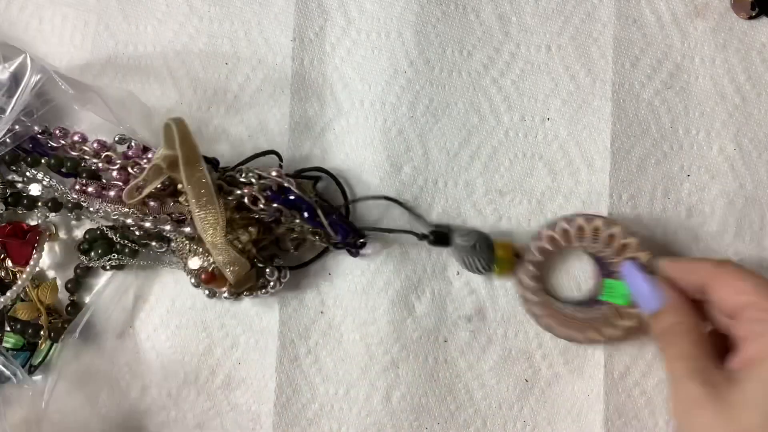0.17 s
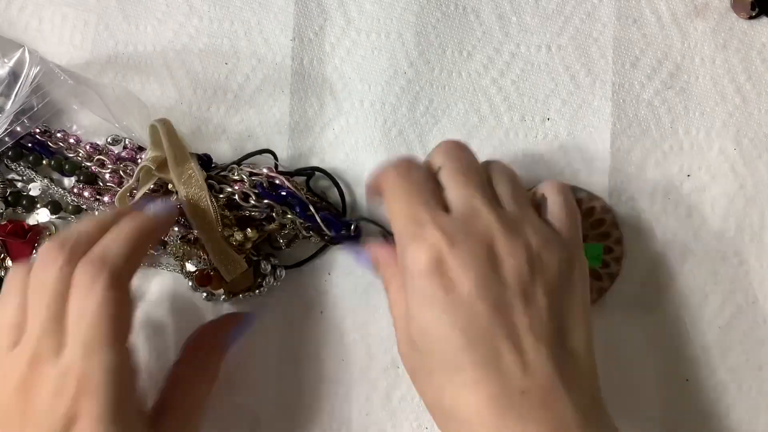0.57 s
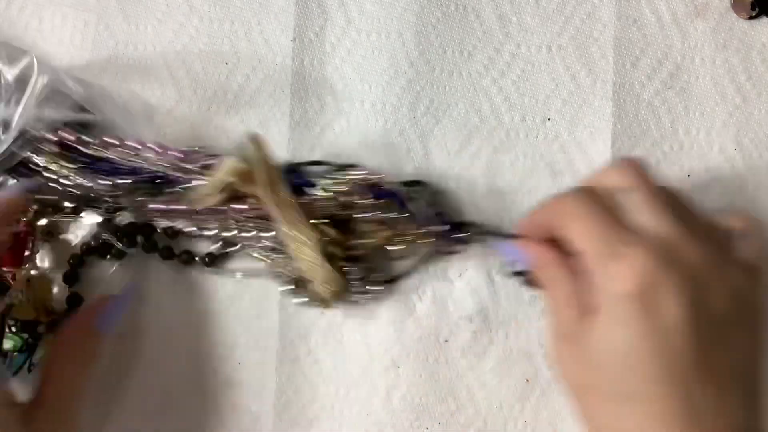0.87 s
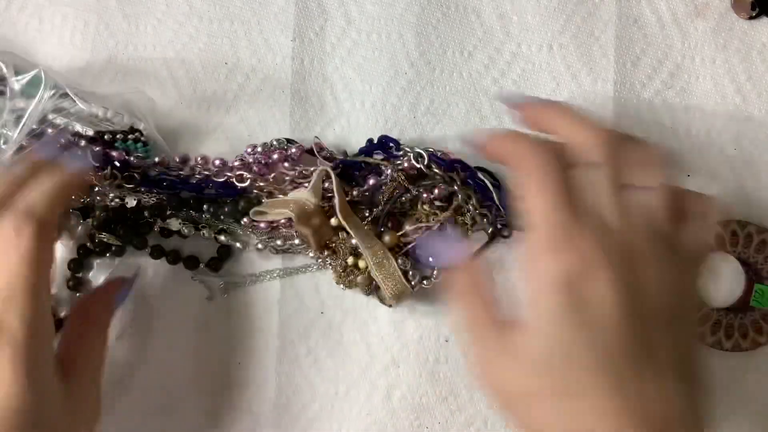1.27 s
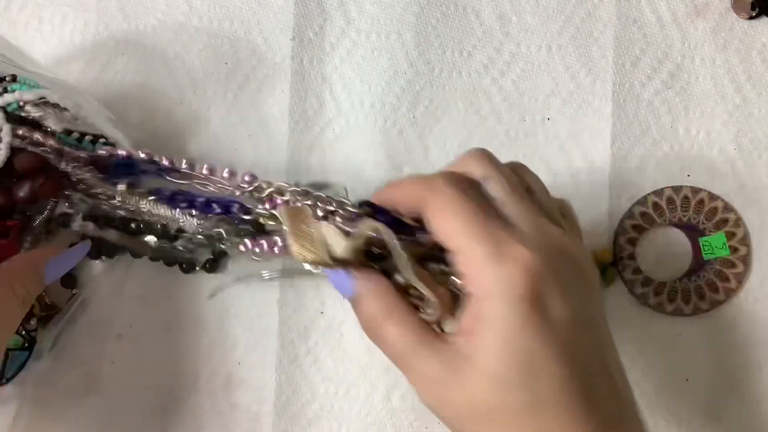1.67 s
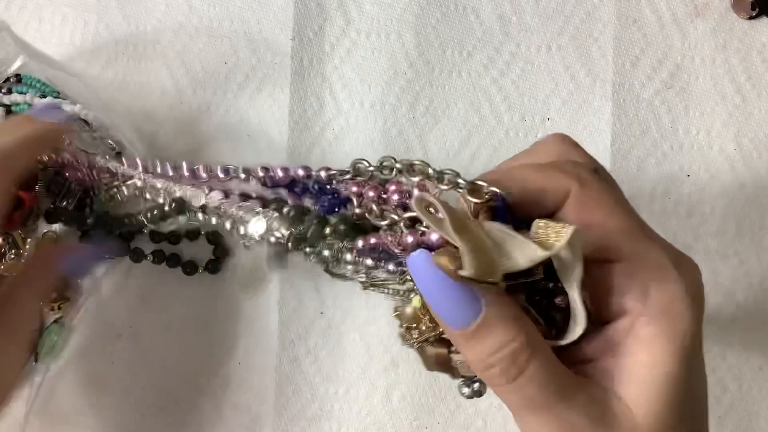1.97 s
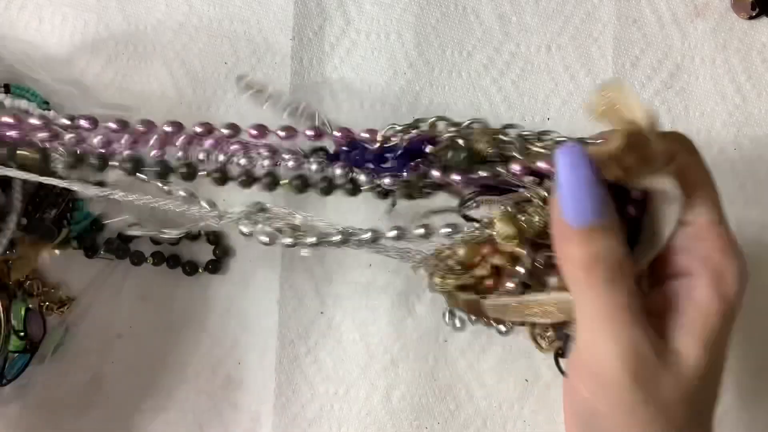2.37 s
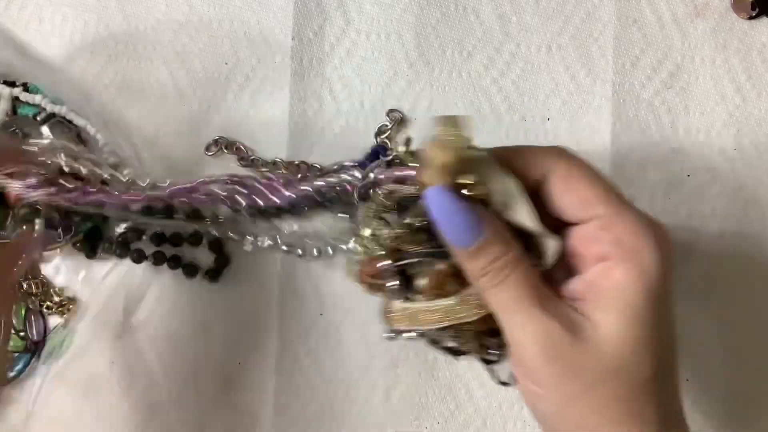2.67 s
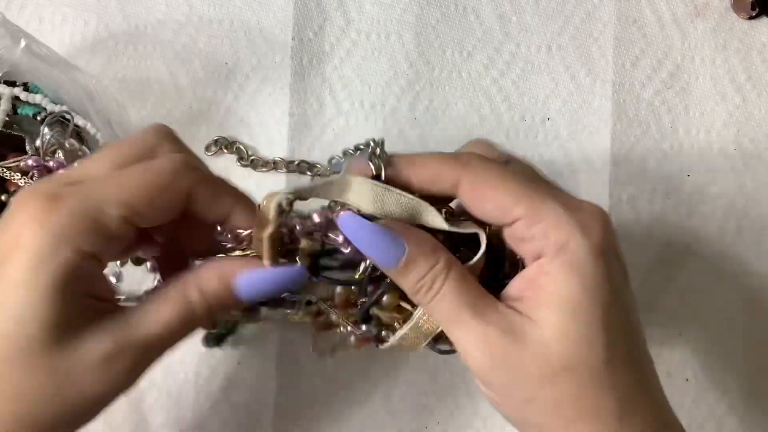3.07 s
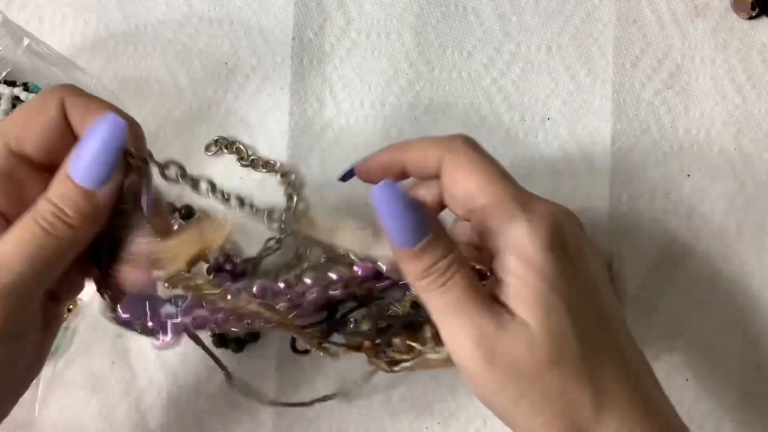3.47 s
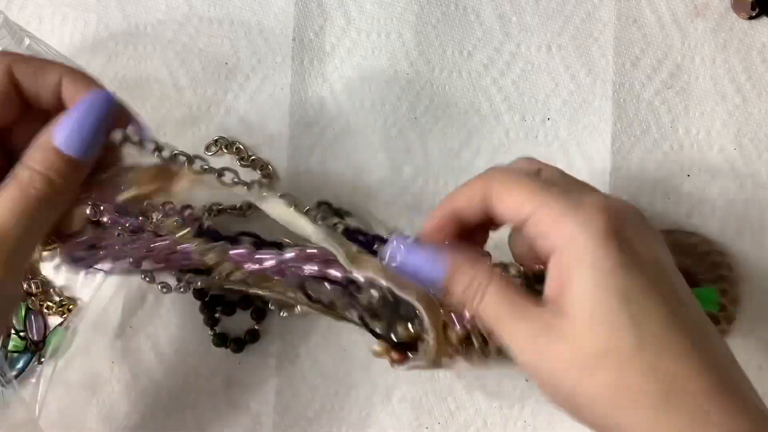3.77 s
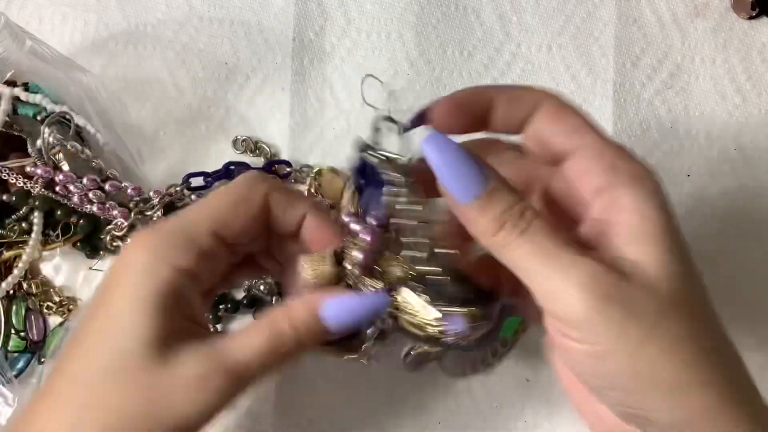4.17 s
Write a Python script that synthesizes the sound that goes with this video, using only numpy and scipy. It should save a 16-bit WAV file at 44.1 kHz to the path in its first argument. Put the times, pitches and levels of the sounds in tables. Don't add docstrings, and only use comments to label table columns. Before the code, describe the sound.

A tangle of beaded necklaces and thin chains is shaken and lifted over a paper-covered table, ticking, rustling and clinking, with two sharp clacks.

```python
import sys
import numpy as np
from scipy import signal
from scipy.fft import rfft, irfft, next_fast_len
from scipy.io import wavfile
from scipy.ndimage import uniform_filter1d

SR = 44100
rng = np.random.default_rng(int(sys.argv[2]) if len(sys.argv) > 2 else 0)


def wav_out(sig):
    wavfile.write(sys.argv[1], SR, np.round(np.clip(np.atleast_2d(sig).T, -1, 1) * 32767).astype(np.int16))


def magnitude_from_level(level_db):
    exponent = np.asarray(level_db, float) / 20
    return 10 ** exponent


N = 190159


# start in seconds, peak in dB, pitch in Hz.
LARGE_BEADS = [(0.0253, -31.5, 4700), (0.4379, -33, 2380), (0.4767, -19, 3000), (0.6162, -30, 5810),
               (0.63, -26.5, 4160), (0.6691, -25.5, 4650), (0.7018, -26, 3760), (0.721, -26, 3800),
               (0.7572, -17, 5830), (0.8694, -15.5, 4680), (1.001, -26.5, 5640), (1.2077, -32, 4800),
               (1.222, -27, 4670), (1.2848, -26, 3120), (1.3636, -14, 3850), (1.3704, -21, 6150),
               (1.4391, -15, 4540), (1.4482, -21, 3180), (2.0164, -10, 5370), (2.1767, -11.5, 3540),
               (2.3383, -9, 3470), (2.3685, -23, 6130), (2.4174, -15.5, 4460), (2.4425, -22, 4400),
               (2.46, -16, 4200), (2.4881, -9.5, 4180), (2.5002, -3, 3670), (2.9668, -27, 4330),
               (3.8219, -3, 5900), (3.827, -7, 4740)]
# start in seconds, peak in dB, pitch in Hz.
SMALL_BEADS = [(0.0255, -21, 10300), (0.4769, -13, 4900), (0.349, -48.5, 6960), (0.6557, -26, 8160),
               (0.856, -22, 10800), (1.0718, -22.5, 8150), (1.129, -23, 7950), (1.329, -30, 5460),
               (1.5388, -23, 4870), (1.568, -22.5, 9300), (1.762, -17, 9720), (1.9424, -20.5, 8200),
               (1.984, -25.5, 3600), (2.004, -21, 10000), (2.1274, -21, 5400), (2.1725, -25, 8800),
               (2.251, -24, 4740), (2.3084, -20, 9300), (2.461, -18, 8800), (2.5002, -1, 7600),
               (2.523, -7.5, 11100), (4.2143, -34, 6000), (2.6802, -25, 7800), (2.8288, -21, 5670),
               (3.8228, -17, 11000), (2.859, -17.5, 5860), (2.8854, -18, 10300), (3.339, -23.5, 9000),
               (3.6673, -22.5, 9200), (3.9912, -29.5, 10000)]
# start in seconds, peak in dB.
LINK_SNAPS = [(0.437, -36), (0.894, -16), (0.9137, -19.5), (0.9415, -32), (0.9635, -21), (1.6118, -20),
              (1.6686, -32), (1.7467, -15), (1.8395, -19), (2.035, -13.5), (2.1207, -15), (2.818, -17),
              (2.9436, -18), (3.0812, -20), (3.0961, -22), (3.1934, -17.5), (3.249, -18), (3.3014, -18),
              (3.3634, -19), (3.3967, -18.5), (3.4225, -20), (3.7062, -14), (3.7653, -16), (3.7906, -18),
              (4.039, -22.5), (4.0514, -16.5), (4.0863, -17), (4.1094, -16.5), (4.2941, -23),
              (4.3014, -18.5)]
CRACK_DB = (-21, -24, -4.5)


def tick_contacts():
    link_hz, spread = 14260, 0.24
    crack_lag_db_per_db = 0.26
    links = np.vstack([LINK_SNAPS, stray_links(count=180)])
    links = np.c_[links, link_hz * np.exp(spread * rng.standard_normal(len(links)))]
    rows = []
    for kind, crack_db in zip([LARGE_BEADS, SMALL_BEADS, links], CRACK_DB):
        peak_db = np.transpose(kind)[1]
        rows.append(np.c_[kind, crack_db - crack_lag_db_per_db * (peak_db + 25)])
    return np.vstack(rows)


def stray_links(count):
    strongest_db, range_db = 23.5, 7
    draw = rng.random((count, 2))
    s = draw[:, 0] * (N - 1) / SR
    shaking_db = motion()[0][(s * SR).astype(int)]
    return np.transpose([s, shaking_db + strongest_db - range_db * draw[:, 1]])


def ticks():
    s, db, hz, crack_db = tick_contacts().T
    hard = magnitude_from_level(0.41 * (db + 26))
    t60_s = 0.01 * magnitude_from_level(0.73 * rng.standard_normal(len(s))) / hard ** 0.086
    width_hz = 0.38 * hz * hard ** 0.14
    z, f = bursts(t60_s, rise_s=0.0001, size=2048, snap=1.68 * hard)
    bead = peaked(z * resonance(f, hz[:, None], width_hz[:, None]))
    z, f = bursts(t60_s, rise_s=0.00016, size=2048, snap=3.6 * hard)
    crack = peaked(z * resonance(f, 8900, 20000) ** 2)
    return placed(s, magnitude_from_level(db - 8)[:, None] * (bead + magnitude_from_level(crack_db + 2.5)[:, None] * crack))


# start in seconds, peak in dB, pendant clack in dB, t60 in seconds.
KNOCKS = [(0.014, -34.5, -16, 0.011), (0.148, -36, -37, 0.049), (0.379, -49.5, -19, 0.3),
          (0.457, -36.5, -14, 0.024), (0.48, -38, -22, 0.05), (0.529, -46, -14, 0.03),
          (0.757, -36.5, 9, 0.1), (0.871, -33.5, -1, 0.053), (1.135, -46.5, -23, 0.04),
          (1.208, -40.5, -6, 0.27), (1.362, -34.5, -8, 0.063), (1.447, -30, -7, 0.027),
          (2.067, -39.5, 1, 0.022), (2.178, -28, 14.5, 0.037), (2.191, -23, -6, 0.039),
          (2.252, -30, -15, 0.024), (2.337, -25.5, 10.5, 0.1), (2.342, -24.5, 2.5, 0.065),
          (2.456, -31.5, 13, 0.033), (2.595, -35.5, -8, 0.082), (2.991, -36.5, -20, 0.043),
          (3.029, -34.5, -25, 0.034), (3.552, -42.5, -60, 0.05), (3.72, -41, 5.5, 0.031),
          (3.823, -14, 7, 0.036), (4.296, -52.5, 17, 0.054)]
# pitch in Hz, width in Hz, level in dB.
TABLE_MODES = [(620, 65, 2), (1050, 106, -6.5), (1400, 300, -12), (2100, 354, 5)]
# pitch in Hz, width in Hz, level in dB.
PENDANT_MODES = [(3040, 470, -13), (4210, 510, 3), (4950, 490, -3.5), (6190, 270, -4.5)]


def knocks():
    s, db, clack_db, t60_s = np.transpose(KNOCKS)
    edge_hz = 1420 * magnitude_from_level(0.46 * (clack_db + 23.5))[:, None]
    z, f = bursts(t60_s, rise_s=0.00033, size=8192, snap=5.3)
    table = body(TABLE_MODES, f) - 1.33 * resonance(f, 1380, 2200)
    top = peaked(z / (1 + 1j * f / edge_hz) ** 2 * table)
    z, f = bursts(0.49 * t60_s, rise_s=0.00078, size=8192, snap=1.1)
    pendant = body(PENDANT_MODES, f) + 0.76 * resonance(f, 3900, 1640)
    clack = peaked(z * pendant)
    return placed(s, magnitude_from_level(db)[:, None] * (top + magnitude_from_level(clack_db - 6.0)[:, None] * clack))


# start in seconds, peak in dB, pitch in Hz.
THUDS = [(0.014, -49, 220), (0.148, -43, 400), (0.48, -42.5, 453), (0.757, -40.5, 445), (1.135, -34.5, 247),
         (1.208, -63, 302), (1.362, -55, 225), (1.377, -40, 273), (2.252, -40, 606), (2.337, -35.5, 346),
         (2.342, -35, 590), (2.595, -42.5, 410), (2.991, -43.5, 440), (3.029, -45, 660), (3.552, -45, 330),
         (3.823, -29, 395)]


def thuds():
    s, db, hz = np.transpose(THUDS)
    z, f = bursts(15.3 / hz, rise_s=0.0026, size=8192, snap=5.7)
    thud = peaked(z * resonance(f, hz[:, None], 0.58 * hz[:, None]) ** 2)
    return placed(s, magnitude_from_level(db)[:, None] * thud)


CHARM_HZ = [14050, 12600, 8840, 8740, 10070, 11400, 10900, 3450, 2760, 15450]
# (start in seconds, peak in dB).
CHARMS = [
    (0.03, [(1.669, -29), (2.094, -32), (2.128, -26.5), (2.508, -26)]),
    (0.15, [(2.019, -43), (2.338, -39), (2.4, -44), (2.871, -46), (3.535, -42), (3.827, -42), (3.867, -48), (3.91, -55)]),
    (0.045, [(2.186, -18.5), (2.222, -36), (2.48, -50), (2.501, -19), (2.525, -29.5)]),
    (0.028, [(2.46, -21.5)]),
    (0.063, [(2.186, -33), (2.508, -45)]),
    (0.12, [(2.523, -33)]),
    (0.05, [(2.55, -62)]),
    (0.45, [(3.88, -60)]),
    (0.048, [(0.143, -51)]),
    (0.15, [(1.88, -50), (2.34, -53), (3.83, -45)]),
]


def charms():
    rows = []
    for hz, (t60_s, strikes) in zip(CHARM_HZ, CHARMS):
        rows += [(s, hz, db, t60_s) for s, db in strikes]
    s, hz, db, t60_s = np.transpose(rows)[..., None]
    t = np.arange(SR // 3) / SR
    split_hz = 45 + 60 * rng.random(hz.shape)
    pair = np.sin(2 * np.pi * hz * t) + 0.058 * np.sin(2 * np.pi * (hz - split_hz) * t)
    flutter = uniform_filter1d(rng.standard_normal(pair.shape), size=130, axis=1)
    flutter = unit(uniform_filter1d(flutter, size=70, axis=1))
    touched_db = 5.7 * flutter * (1 - np.exp(-t / 0.015))
    attack = 1 - np.exp(-t / 0.00038)
    return placed(s[:, 0], magnitude_from_level(db + 0.5 - 60 * t / t60_s + touched_db) * pair * attack)


# time in seconds, level in dB.
SHAKE = [(0.0, -65.5), (0.3, -87.5), (0.58, -74), (0.68, -51.5), (0.84, -45.5), (0.97, -54.5),
         (1.05, -69.5), (1.5, -56.5), (1.6, -47.5), (1.76, -42.5), (1.9, -56.5), (2.15, -50), (2.45, -72),
         (2.76, -56.5), (2.82, -47.5), (3.52, -52.5), (3.64, -58), (3.94, -67.5)]
# time in seconds, level in dB.
DRAG = [(0.0, -65), (0.25, -85), (0.42, -74), (0.6, -70), (0.74, -49.5), (0.88, -52.5), (1.0, -68),
        (1.17, -66), (1.27, -55.5), (1.55, -66.5), (1.92, -67), (2.2, -51), (2.42, -69), (2.76, -75.5),
        (3.0, -63.5), (3.25, -75.5), (3.73, -79), (4.31, -79)]
# start in seconds, length in seconds, shaking in dB, drag in dB.
SLUMPS = [(0.408, 0.067, -70, -56.5), (1.205, 0.026, -60, -55.5), (2.335, 0.045, -49.5, -49.5),
          (2.465, 0.14, -45, -54), (3.563, 0.068, -57, -68.5), (3.76, 0.08, -41, -64.5),
          (3.67, 0.077, -56.5, -75.5), (3.985, 0.015, -59, -75), (4.044, 0.1, -58.5, -74.5),
          (4.17, 0.136, -61, -76), (4.287, 0.05, -52, -73)]


def motion():
    rise_db_s, fall_db_s = 1600, 380
    s, length_s, *peaks_db = np.transpose(SLUMPS)[..., None]
    t = np.arange(N) / SR - s
    shape_db = np.minimum(0, np.minimum(rise_db_s * t, -fall_db_s * (t - length_s)))
    levels_db = []
    for steady, peak_db in zip([SHAKE, DRAG], peaks_db):
        steady_db = np.interp(np.arange(N) / SR, *np.transpose(steady))
        levels_db.append(np.maximum(steady_db, (peak_db + shape_db).max(0)))
    return levels_db


# frequency in Hz, dB per Hz.
LINKS = [(2940, -19), (5000, -1), (5940, 2.5), (6410, -6.5), (7880, 1), (13800, 6), (15700, -0.5)]
BEADS = [(1180, -24), (2000, 0.5), (2630, -1.5), (3130, 1), (4330, 5), (5880, 5), (6380, -5), (8000, 1),
         (10400, -16), (17600, -120)]
PAPER = [(150, 4), (250, -6), (563, 0.5), (818, -9), (1250, -2.5), (1560, -4), (3000, -21), (3900, -23),
         (6600, -120)]
LEGS = [(35, -18), (55, -10), (120, -2.5), (240, -2), (420, -13), (900, -34)]


def rustle():
    shake_db, drag_db = motion()
    beads_db = shake_db + 0.55 * (drag_db - shake_db) - 1
    legs_db = -60.5 + 0.26 * (drag_db - drag_db.mean())
    jolts = contacts(count=450, spread_db=2, t60_s=0.063)
    links = swarm(LINKS, 1.12 * jolts, 0.75 * contacts(count=1800, spread_db=2, t60_s=0.0026), smooth=0.45)
    beads = swarm(BEADS, 0.45 * jolts, 0.89 * contacts(count=1000, spread_db=7.5, t60_s=0.0053), smooth=0.45)
    paper = swarm(PAPER, 0.36 * jolts, 1.05 * contacts(count=260, spread_db=4.5, t60_s=0.036), smooth=0.69)
    legs = swarm(LEGS, 0.2 * jolts, 0.11 * contacts(count=120, spread_db=3.5, t60_s=0.093), smooth=0.75)
    chain = magnitude_from_level(shake_db + 2.46) * links + magnitude_from_level(beads_db + 5.0) * beads
    return chain + magnitude_from_level(drag_db + 3.5) * paper + magnitude_from_level(legs_db - 0.5) * legs


def contacts(count, spread_db, t60_s):
    draw = rng.random((count, 2))
    size_db = np.minimum(-spread_db * np.log(draw[:, 1]), 13)
    power = np.bincount((draw[:, 0] * N).astype(int), magnitude_from_level(2 * size_db), N)
    puff = magnitude_from_level(-120 * np.arange(1500) / SR / t60_s)
    return unit(np.sqrt(np.abs(signal.fftconvolve(power, puff)[:N])))


def swarm(spectrum, shared, own, smooth):
    loudness = np.sqrt(shared ** 2 + own ** 2 + smooth ** 2)
    return coloured(loudness * rng.standard_normal(N), spectrum)


# frequency in Hz, t60 in seconds.
ROOM = [(200, 0.32), (2000, 0.23), (6000, 0.18), (14000, 0.1)]


def room(x):
    out, step = np.zeros(N + 2 * SR), SR // 4
    for start in range(0, N, step):
        hz, t, z = signal.stft(rng.standard_normal(SR // 2), SR, nperseg=256)
        decay = magnitude_from_level(-60 * t / along(ROOM, hz)[:, None])
        tail = signal.istft(z * decay, SR, nperseg=256)[1]
        wet = signal.fftconvolve(x[start:start + step], tail / np.linalg.norm(tail))
        out[start + 130:][:len(wet)] += wet
    return out[:N]


# frequency in Hz, dB per Hz.
AIR = [(26, -19), (45, 0.5), (96, -15.5), (132, 4), (157, -32), (250, -39), (352, -60), (408, -12.5),
       (534, -26), (619, -14.5), (753, -15), (15700, -68)]


def air():
    return magnitude_from_level(-66.5) * coloured(rng.standard_normal(N), AIR)


def unit(x):
    return x / np.sqrt(np.mean(x ** 2) + 1e-20)


def along(points, hz):
    f, v = np.transpose(points)
    return np.interp(np.log(hz + 1), np.log(f + 1), v)


def filtered(x, curve):
    m = next_fast_len(N + 8192)
    gain = magnitude_from_level(along(curve, np.fft.rfftfreq(m, 1 / SR)))
    return irfft(rfft(x, m) * gain, m)[..., :N]


def coloured(x, spectrum):
    return unit(filtered(x, spectrum))


def resonance(f, hz, width_hz):
    return 1j * f * width_hz / (hz * hz - f * f + 1j * f * width_hz)


def body(modes, f):
    return sum((-1) ** k * magnitude_from_level(db) * resonance(f, hz, w) for k, (hz, w, db) in enumerate(modes))


def bursts(t60_s, rise_s, size, snap):
    t = np.arange(size) / SR
    decay = magnitude_from_level(-60 * t / np.maximum(t60_s, 0.002)[:, None])
    shape = decay * (1 - np.exp(-t / rise_s)) * (t < t[-1] * 0.7)
    rows = shape * rng.standard_normal(shape.shape)
    rows[:, 2] += snap
    return rfft(rows), np.fft.rfftfreq(size, 1 / SR)


def peaked(spectra):
    rows = irfft(spectra)
    return rows / np.abs(rows).max(1, keepdims=True)


def placed(seconds, rows):
    at = np.round(seconds * SR).astype(int)[:, None] + np.arange(rows.shape[1])
    return np.bincount(at.ravel(), rows.ravel(), N + SR)[:N]


def scene():
    hits = ticks() + knocks() + thuds()
    rings = charms()
    echo = magnitude_from_level(-8.5) * room(hits + 0.37 * rings)
    return (hits + rings + rustle() + echo + air())[None]


# frequency in
# Hz, gain in dB.
BAND_EDGES = [(30, -30), (46, 0), (15800, 0), (16050, -36), (16900, -42), (17000, -120)]


def band_limited(x):
    return filtered(x, BAND_EDGES)


def roll_off(x):
    return signal.sosfilt(signal.butter(12, 16970, fs=SR, output="sos"), x)


def record(dry):
    mix = band_limited(dry)
    return roll_off(mix)


dry = scene()
out = record(dry)
wav_out(out)
```